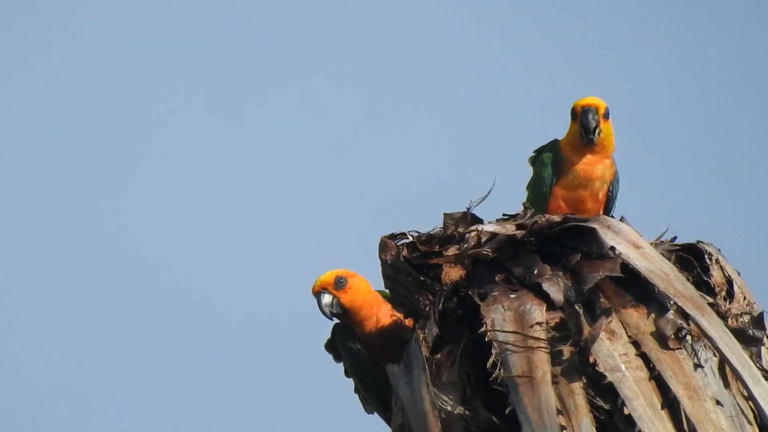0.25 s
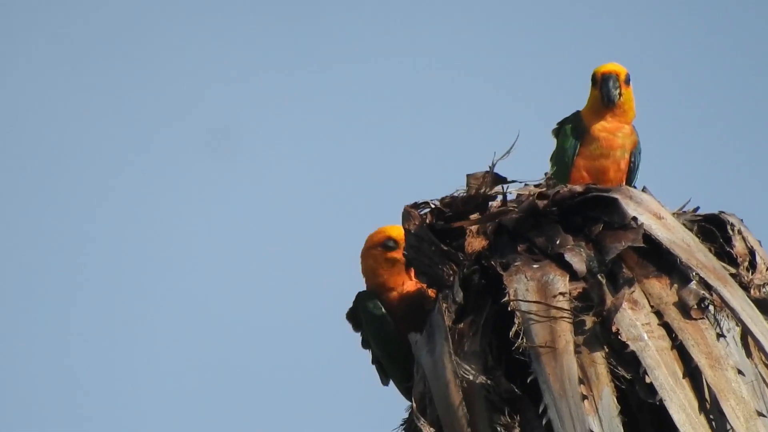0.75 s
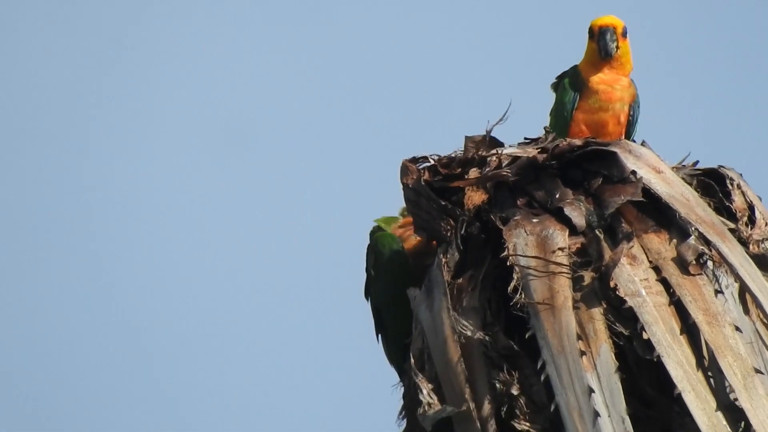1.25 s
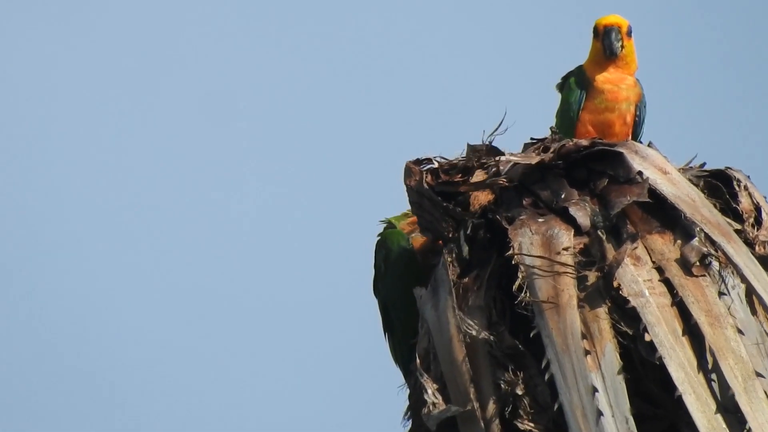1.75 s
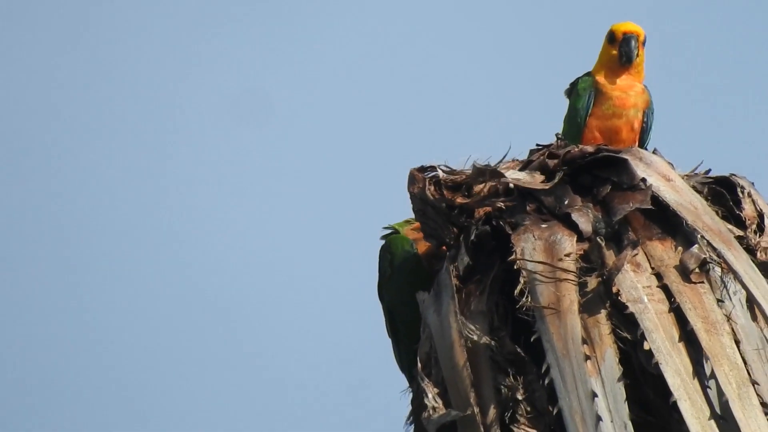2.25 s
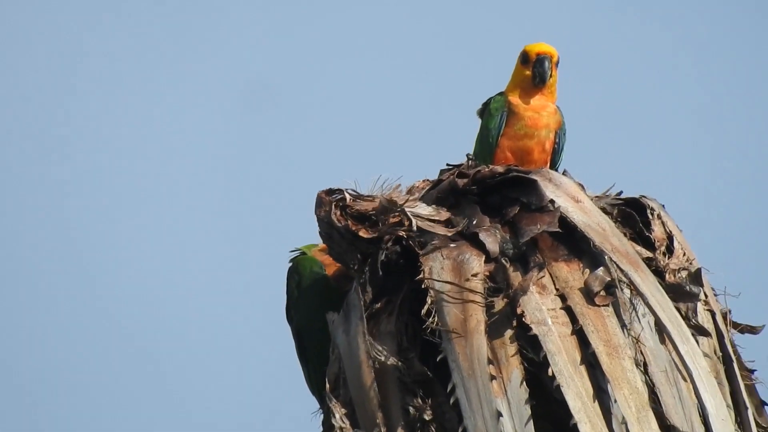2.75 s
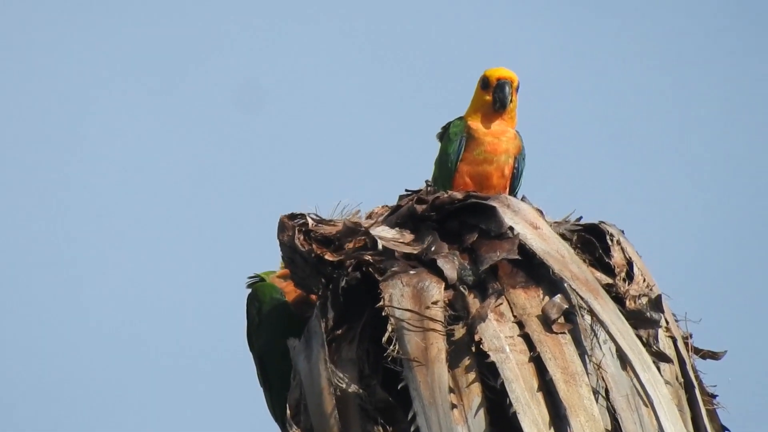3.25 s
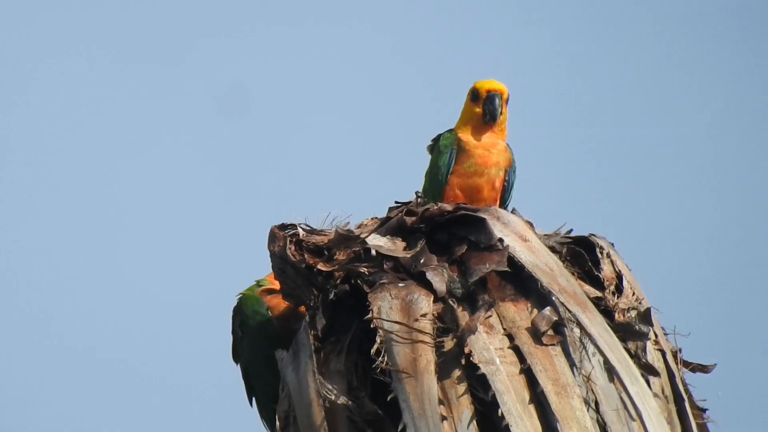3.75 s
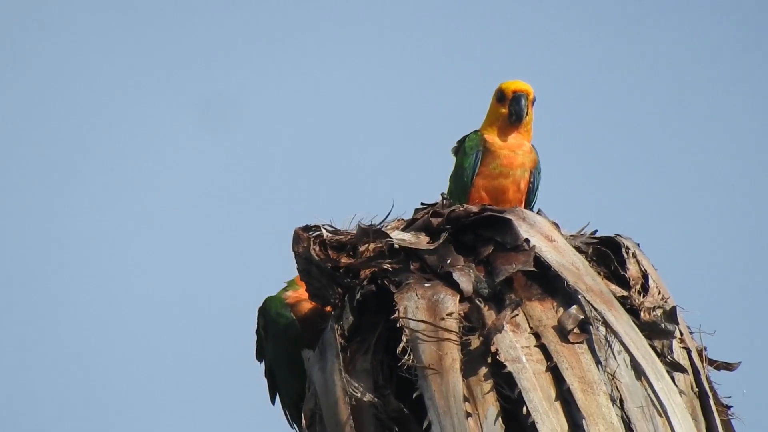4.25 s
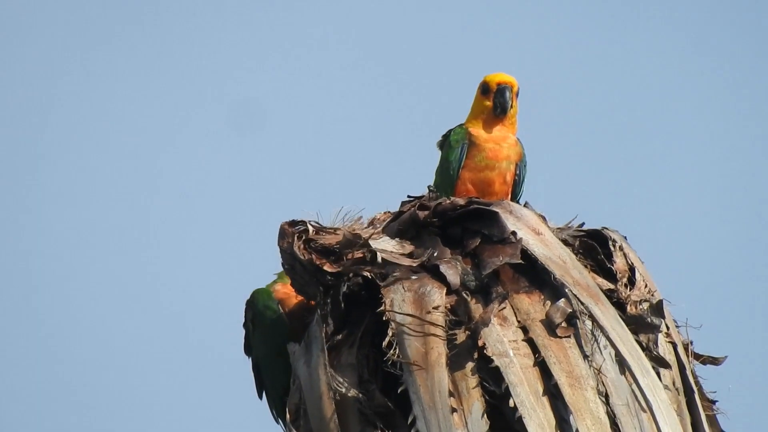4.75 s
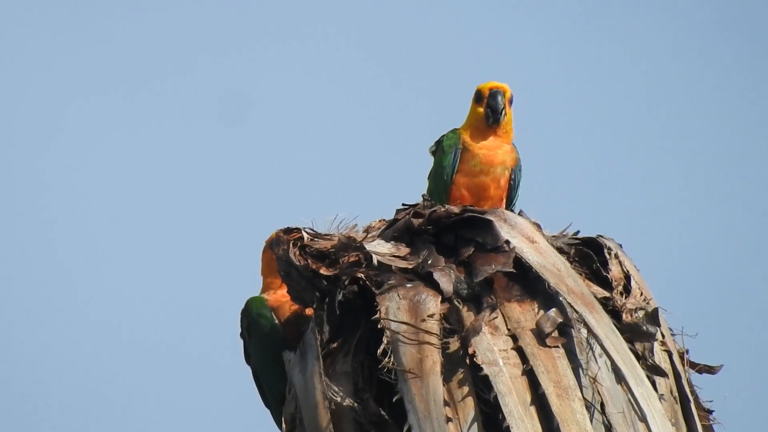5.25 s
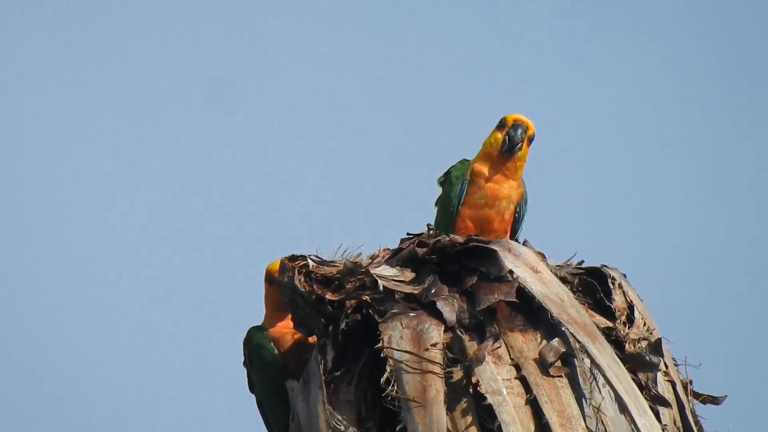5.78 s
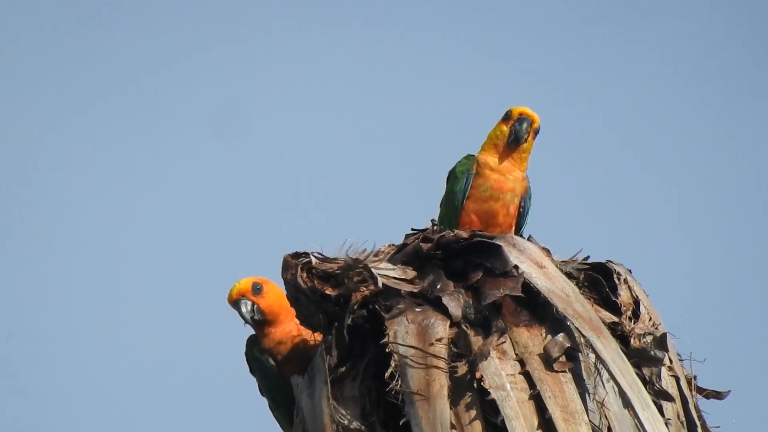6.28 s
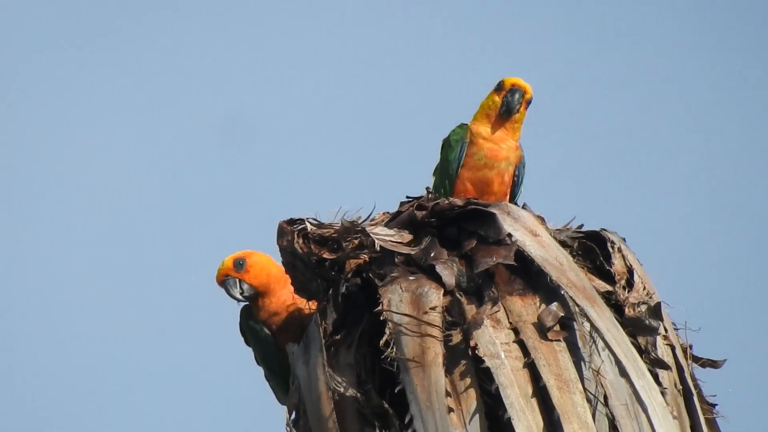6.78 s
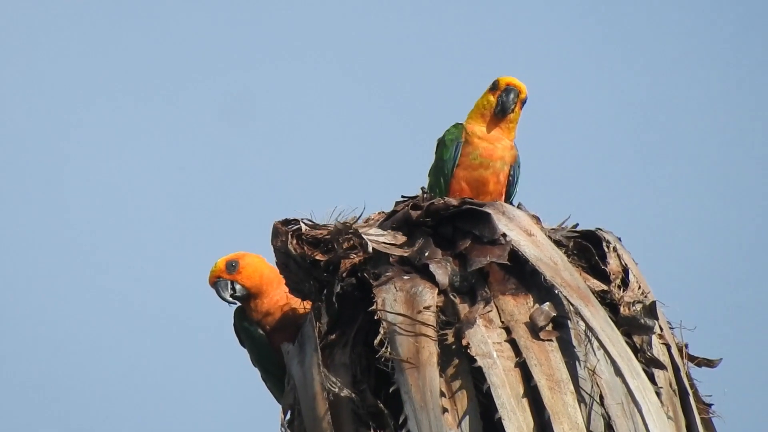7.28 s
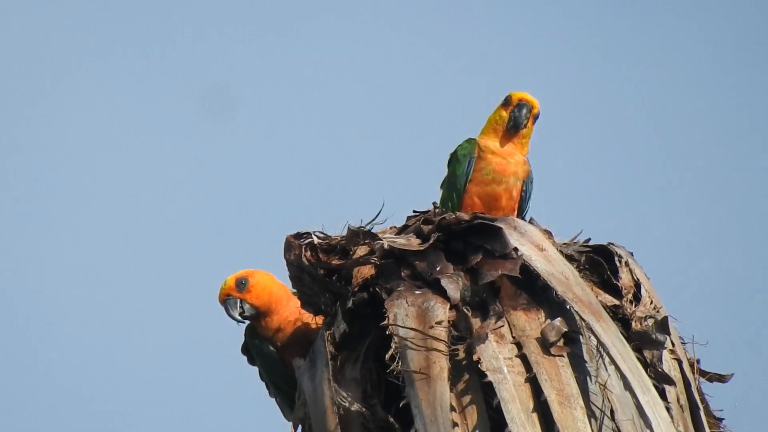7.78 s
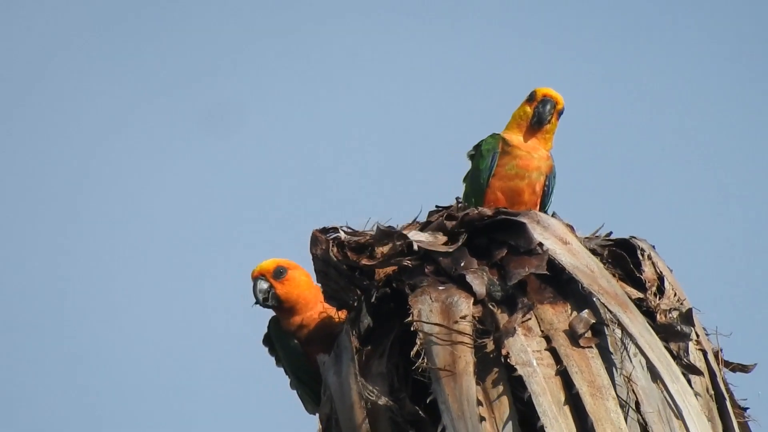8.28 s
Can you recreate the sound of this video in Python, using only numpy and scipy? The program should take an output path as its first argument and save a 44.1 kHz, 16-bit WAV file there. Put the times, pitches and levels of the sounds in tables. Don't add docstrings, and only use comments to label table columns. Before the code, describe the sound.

Loud raspy parrot screams, one early and four in quick succession later, echo among trees while small birds whistle and light wind bumps the microphone.

```python
import sys
import numpy as np
from scipy import signal
from scipy.fft import rfft, irfft
from scipy.io import wavfile
from scipy.ndimage import uniform_filter1d

SR = 44100
rng = np.random.default_rng(int(sys.argv[2]) if len(sys.argv) > 2 else 0)


def materialize(psi):
    bounded = np.clip(np.atleast_2d(psi).T, -1, 1)
    quanta = np.round(bounded * 32767).astype(np.int16)
    wavfile.write(sys.argv[1], SR, quanta)


def boost_factor(decibels):
    exponent = np.asarray(decibels, float) / 20
    return 10 ** exponent


N = 375732
LEFT_RIGHT = np.array([[.5], [-.5]])


def evened(x):
    return x / np.sqrt(np.mean(x ** 2) + 1e-20)


def read(points, hz):
    f, value = np.transpose(points)
    return np.interp(np.log(hz + 1), np.log(f + 1), value)


def add(mix, s, sound):
    part = mix[..., round(s * SR):][..., :sound.shape[-1]]
    part += sound[..., :part.shape[-1]]


def wander(count, blur_hz):
    r = np.exp(-np.pi * blur_hz / SR)
    z = rng.standard_normal((count + 2000, 2)) @ [1, 1j]
    z = signal.lfilter([1], np.convolve([1, -r], [1, -r]), z)[2000:]
    return z / np.sqrt(np.mean(abs(z) ** 2))


# frequency in Hz, level in dB over the effort.
SECOND = [(1800, -19), (2050, -26.5), (2100, -16), (2140, -38.5), (2195, -9), (2250, -14.5), (2320, -10.5)]
THIRD = [(2700, -41), (3000, -18), (3110, -9.5), (3175, -10), (3260, -31.5), (3320, -16.5), (3370, -5),
         (3450, -16)]
FOURTH = [(3600, -3), (3950, -8), (4170, -3), (4290, -3), (4390, -11), (4480, -5), (4600, -7)]
SIXTH = [(5400, 4.5), (5900, 4), (6250, 3.5), (6500, 3.5), (6650, 0.5), (6900, 2)]
# frequency in Hz, level in dB over the 6th partial.
BEAK = [(4800, -1.5), (7000, -3), (8000, -14.5), (9100, -22), (10000, -29), (11300, -48), (12400, -49.5),
        (13500, -67), (15500, -68)]
# frequency in Hz, left-right dB toward the palm.
PORTS = [(2000, 3), (3500, 1), (4500, 4), (5300, -1), (6400, 5.5), (6800, -3.5), (7400, 10), (8000, 4.5),
         (8900, -4.5), (10500, 7)]
# frequency in Hz, radians the left port leads.
LEAD = [(0, 0.66), (3100, -0.31), (4220, 0.76), (4480, -0.74), (5860, 0.93), (6550, -1.02), (6800, -0.84),
        (7750, -1.1), (8270, -0.36), (8530, -1.9), (9560, 1), (10800, -0.55), (11700, -0.3), (15300, 0.0)]


def scream(length, db, swell_db, arch, head):
    top_hz, rise, sag, collapse, drop_hz = arch
    second_db, third_db, odd_db, top_db = head
    t = np.arange(0, length, 1 / SR)
    to_end = t - length

    hz = top_hz - 250 * np.exp(-t / rise) - sag * t
    hz = hz - drop_hz * np.maximum(1 + to_end / collapse, 0) ** 1.8
    turns = np.cumsum(hz * (1 + 0.004 * wander(len(t), 145).real)) / SR

    effort = db + swell_db * (t / length - .5)
    effort = effort - 15 * np.exp(-t / 0.005) - 24 * np.exp(to_end / 0.0058)
    low = effort - np.exp(-t / 0.007) - 21 * np.exp(to_end / 0.007)
    sixth = effort + read(SIXTH, 6 * hz)
    late_db = odd_db - 26 * np.exp(-(t / 0.011) ** 2) - 12 * np.exp(-(to_end / 0.013) ** 2)

    level = {}
    for k in range(5, 14):
        level[k] = sixth + read(BEAK, k * hz)
        if k % 2:
            level[k] = level[k] + late_db - (k > 10) * odd_db
        if k > 8:
            level[k] = level[k] + top_db - 14 * np.exp(-t / 0.0068)
    level[2] = low + second_db + read(SECOND, 2 * hz)
    level[1] = level[2] - 28
    level[3] = low + third_db + read(THIRD, 3 * hz)
    level[4] = effort + read(FOURTH, 4 * hz)
    level[6] = sixth

    out = 0
    for k, partial_db in level.items():
        flutter_db = (1.2 + .17 * k) * wander(len(t), 60).real
        apart = .5 * wander(len(t), 22)
        lead = LEFT_RIGHT * (1.3 * read(LEAD, k * hz) + k / 6 * apart.imag)
        tone = np.sqrt(2) * np.cos(2 * np.pi * (k * turns + rng.random()) + lead)
        side_db = LEFT_RIGHT * (read(PORTS, k * hz) + 5 * apart.real)
        out = out + boost_factor(partial_db + flutter_db + side_db) * tone
    return out * signal.windows.tukey(len(t), .04)


def note(length, first_hz, last_hz, db, blur_hz):
    u = np.linspace(0, 1, round(length * SR))
    turns = np.cumsum(first_hz + (last_hz - first_hz) * u) / SR
    carrier = np.exp(2j * np.pi * turns)
    tone = ((70 / blur_hz + wander(len(u), 2.17 * blur_hz)) * carrier).real
    return boost_factor(db + LEFT_RIGHT * 1.5) * evened(tone) * signal.windows.tukey(len(u), .6)


def notes_of(rows, blur_hz):
    mix = np.zeros((2, N))
    for s, *row in rows:
        add(mix, s, note(*row, blur_hz))
    return mix


# start in seconds, length in seconds, effort in dB, swell of the effort in dB.
SCREAMS = [
    (0.293, 0.17, -19, -2),
    (5.37, 0.17, -15.5, -0.5),
    (5.679, .16, -17.5, 0),
    (6.065, .178, -19.5, 6.5),
    (6.433, 0.17, -23.5, 2.5),
]
# pitch in Hz, rise in seconds, sag in Hz per second,
# collapse in seconds, collapse in Hz.
ARCH = [(1169.5, 0.0078, 540, .06, 165), (1172, .012, 540, .035, 200), (1149.4, 0.0063, 300, 0.052, 200),
        (1112.7, 0.00498, 300, .047, 205), (1091.2, 0.00615, 280, 0.05, 190)]
# 2nd partial in dB, 3rd in dB, high odd partials in dB,
# partials above 9.5 kHz in dB.
HEAD = [(1, -0.5, -8.5, 1.5), (-4.5, -4.5, -6, 5), (-5, -4, -10.5, 1), (-1.5, 1, -9, 6.5),
        (-0.5, 1.5, -15.5, 3)]
# lead in seconds, pitch in Hz, level in dB.
OPENINGS = [(.013, 2900, -31), (.011, 3180, -33.5), (.012, 3220, -36.5), (.016, 2780, -33.5),
            (.012, 3570, -35.5)]


def near_parakeet():
    mix = np.zeros((2, N))
    for (s, *row), arch, head, (lead, hz, db) in zip(SCREAMS, ARCH, HEAD, OPENINGS):
        add(mix, s, scream(*row, arch, head))
        add(mix, s - lead, note(0.0135, hz, 1.15 * hz, db, blur_hz=249))
    return mix


# multiple of the pitch, level in dB.
FAR_ORDERS = [(2, -0.5), (3, -2), (4, 3.5), (5, -12), (6, 2), (7, -14), (8, -36)]


def far_call(length, hz, db, blur_hz):
    u = np.linspace(0, 1, round(length * SR))
    arch = 1 - .13 * np.exp(-u / .17) - .03 * u - .12 * np.exp((u - 1) / .1)
    turns = np.cumsum(hz * arch) / SR
    stack = 0
    for k, order_db in FAR_ORDERS:
        dull_db = 0.031 * blur_hz * max(k - 3.5, 0)
        blurred = 50 / blur_hz + wander(len(u), blur_hz)
        stack = stack + boost_factor(order_db - dull_db) * (blurred * np.exp(2j * np.pi * k * turns)).real
    return boost_factor(db + LEFT_RIGHT * 6.5) * evened(stack) * signal.windows.tukey(len(u), .5)


# start in seconds, length in seconds, pitch in Hz, level in dB, blur in Hz.
FAR = [
    (0.938, 0.12, 1032, -43.5, 39),
    (1.183, 0.185, 1140, -35.5, 8),
    (1.292, 0.115, 1007, -40.5, 66),
]


def far_parakeets():
    mix = np.zeros((2, N))
    for s, *row in FAR:
        add(mix, s, far_call(*row))
    return mix


# start in seconds, length in seconds, first Hz, last Hz, level in dB. The first row is the
# 2 kHz tone of the faint far parakeet call.
WHISTLES = [(0.964, 0.065, 2020, 2050, -60), (8.009, 0.079, 3640, 3670, -41.5),
            (0.524, 0.19, 2010, 1988, -54), (1.599, 0.044, 2930, 2660, -46.5),
            (1.814, 0.17, 2660, 2820, -50.5), (1.929, 0.099, 2356, 2325, -47.5),
            (2.307, 0.14, 2010, 1927, -50), (2.994, .12, 4770, 5700, -47), (3.209, 0.15, 4860, 4880, -49),
            (3.518, 0.037, 5150, 4920, -51), (3.495, 0.071, 2970, 2840, -46),
            (3.509, 0.086, 6400, 6440, -48), (3.767, 0.04, 4730, 4700, -46),
            (3.97, 0.058, 5150, 4870, -45.5), (4.03, 0.046, 5070, 5000, -49),
            (4.156, 0.052, 5840, 4720, -50), (4.394, 0.033, 5480, 4960, -39),
            (4.443, 0.093, 4570, 4620, -49.5), (4.856, 0.06, 4840, 4680, -50),
            (7.016, 0.15, 2374, 2394, -55)]


def whistles():
    return notes_of(WHISTLES, blur_hz=50)


# start in seconds, length in seconds, first Hz, last Hz, level in dB. The last
# row is the rough 4 kHz part of a far parakeet call.
WARBLE = [(6.685, 0.075, 3680, 4090, -42.5), (6.779, 0.16, 3840, 3990, -50.5),
          (6.889, 0.087, 3570, 3180, -50), (6.968, 0.091, 3870, 3747, -48.5),
          (7.018, 0.068, 3660, 3790, -48), (7.091, 0.062, 3650, 3620, -48), (7.133, 0.13, 3900, 4320, -47),
          (7.202, 0.067, 3580, 3590, -39.5), (7.33, 0.19, 3690, 3730, -43),
          (7.465, 0.061, 4060, 3980, -44.5), (7.503, 0.135, 3620, 3490, -51),
          (7.396, 0.095, 2760, 3070, -50.5), (7.702, 0.083, 3800, 4020, -46),
          (1.303, 0.12, 3880, 4010, -40)]
# start in seconds, length in seconds, first Hz, last Hz, level in dB.
CHATTER = [
    (3.175, 0.077, 3920, 4300, -42),
    (7.641, 0.242, 3600, 3500, -51),
    (7.64, 0.165, 4200, 4760, -45),
    (7.74, .32, 4600, 5030, -45.5),
    (7.748, 0.57, 3115, 2700, -57.5),
]


def far_song():
    return notes_of(WARBLE, blur_hz=105) + notes_of(CHATTER, blur_hz=320)


# frequency in Hz, t60 in seconds.
TREES = [(2000, 0.55), (4500, 1), (6500, 0.68), (10000, 0.27)]


def trees(x, close_db):
    taps = np.zeros((2, SR))
    at = np.arange(100, SR - 20, 20) + rng.integers(0, 20, (1, (SR - 101) // 20))
    shared = rng.choice([-1., 1.], at.shape)
    own = rng.choice([-1., 1.], (2, at.size))
    np.put_along_axis(taps, at + [[0], [0]], shared + 0.5 * own, 1)
    taps *= 1 + boost_factor(close_db - 60 * np.arange(SR) / SR / 0.17)
    hz, t, z = signal.stft(taps, SR, nperseg=256)
    decay = boost_factor(-60 * t / read(TREES, hz)[:, None])
    tail = signal.istft(z * decay, SR, nperseg=256)[1]
    return signal.oaconvolve(x, tail[:, :SR * 2 // 3] / np.linalg.norm(tail[0]), axes=1)[:, :N]


def earlier_echo():
    earlier = scream(*SCREAMS[0][1:], ARCH[0], HEAD[0])
    echo = trees(np.pad(earlier, ((0, 0), (0, SR))), close_db=-7)
    mix = np.zeros((2, N))
    add(mix, 0, boost_factor(-15) * echo[:, earlier.shape[1] + 2500:])
    return mix


def snap(db, hz, side_db, width_hz, decay):
    t = np.arange(round(6 * decay * SR)) / SR
    band = (wander(len(t), width_hz) * np.exp(2j * np.pi * hz * t)).real
    band = band * np.exp(-t / decay) * np.minimum(t / 0.00063, 1)
    band = signal.lfilter(*signal.butter(4, 9500, fs=SR), band)
    return boost_factor(db + LEFT_RIGHT * side_db) * band / abs(band).max()


# start in seconds, peak in dB, pitch in Hz, left-right dB.
TICKS = [(2.5158, -39, 1060, 1.2), (2.5293, -28, 6450, 13), (2.7175, -31, 4630, 7), (3.3994, -37, 6100, 4),
         (3.4431, -35, 6500, 4), (3.7232, -32, 6130, 4), (3.86, -32, 6370, -2), (4.4132, -20.5, 5360, 9),
         (4.7604, -28.5, 8200, 8), (4.888, -33, 4900, 2.2), (6.994, -42, 3900, 0), (7.08, -33.5, 6500, 5),
         (7.317, -31.5, 6720, 2.2), (7.944, -37, 4770, 9)]
# start in seconds, peak in dB, pitch in Hz, width in Hz,
# decay in seconds.
KNOCKS = [
    (2.519, -29.5, 1075, 200, 0.006),
    (1.346, -26, 5800, 2000, 0.077),
    (2.519, -26.5, 3260, 1200, 0.0035),
    (4.398, -30, 1387, 1500, 0.028),
    (4.403, -26, 3420, 700, 0.0096),
    (4.418, -29, 4610, 3030, 0.052),
    (6.993, -27, 6800, 2000, 0.0019),
]


def fronds():
    mix = np.zeros((2, N))
    for s, *row in TICKS:
        add(mix, s, snap(*row, width_hz=2700, decay=0.0064))
    for s, db, hz, *ring in KNOCKS:
        add(mix, s, snap(db, hz, 1.7, *ring))
    return mix


# start in seconds, length in seconds, first Hz, last Hz, level in dB. The first row is a
DRONE = [(3.83, 0.39, 50.1, 49.2, -39), (.9, 0.49, 158.5, 154.5, -51), (2.0, 0.42, 159.6, 152.5, -50.5),
         (2.66, 0.38, 152.6, 232.5, -46.5), (4.6, 0.21, 195.7, 210, -48.5), (5.1, 0.22, 203, 202, -52.5),
         (5.72, 0.22, 178.6, 210, -48), (6.22, 0.54, 200, 187, -54), (6.85, 0.37, 204, 204.3, -52),
         (8.0, 0.56, 130.5, 110.5, -53)]


def engine():
    return notes_of(DRONE, blur_hz=14)


# frequency in Hz, left-right likeness.
SAME = [(40, 0.73), (130, 0.81), (290, 0.77), (640, 0.93), (1400, 0.85), (3100, 0.7), (6800, 0.093),
        (15000, 0.037)]
# frequency in Hz, left-right dB.
LEAN = [(60, 1.0), (180, 1.5), (550, 2.5), (1650, 1.5), (4970, 1.5), (15000, 1.0)]


def hiss(field_db, size):
    frames = N * 4 // size + 5
    hz = np.fft.rfftfreq(size, 1 / SR)[:, None]
    a, b, c, d = rng.standard_normal((frames, len(hz), 4)).T
    same = np.clip(read(SAME, hz), -1, 1)
    left = a + 1j * b
    z = np.array([left, same * left + np.sqrt(1 - same ** 2) * (c + 1j * d)])
    level_db = field_db(hz, np.arange(frames) * size / 4 / SR)
    z *= boost_factor(level_db + LEFT_RIGHT[:, :, None] * read(LEAN, hz))
    return evened(signal.istft(z, nperseg=size, noverlap=size * 3 // 4)[1][:, :N])


# start in seconds, length in seconds, bump in dB, roar in dB over the steady breeze.
GUSTS = [
    (1.75, 0.13, 12, -1),
    (2.366, .16, 13.5, -4.5),
    (3.325, 0.064, 3, 2.5),
    (3.822, 0.23, 16, 9),
    (5.768, 0.13, 7, -1.5),
    (6.536, 0.068, 8, -4),
    (6.74, 0.12, 5, 0),
    (7.774, 0.17, 15.5, -2),
]
# frequency in Hz, level in dB per Hz.
BUMP = [(20, -19), (32, -11), (47, -8.5), (60, 4), (85, -10)]
ROAR = [(70, -8.5), (100, -1), (200, 0), (250, -10.5), (400, -14.5)]


def wind():
    hz = np.fft.rfftfreq(N, 1 / SR)
    gusts_db = np.zeros((2, N))
    for s, length, *db in GUSTS:
        add(gusts_db, s, np.outer(db, signal.windows.tukey(round(length * SR), .35)))
    lumps_db = 0.5 * wander(N, 7.2).real
    flat = rfft(hiss(lambda f, _: 0 * f, size=1024))
    bump = evened(irfft(flat * boost_factor(read([(1, -82)] + BUMP + [(200, -86)], hz)), N))
    roar = evened(irfft(flat * boost_factor(read([(30, -80)] + ROAR + [(900, -80)], hz)), N))
    return boost_factor(-56 + gusts_db[0] + lumps_db) * bump + boost_factor(-50 + gusts_db[1]) * roar


# frequency in Hz, level in dB per Hz.
AIR = [(130, -49), (250, -21), (400, -19.5), (560, -7), (800, -16), (1140, -12.5), (1500, -18),
       (3000, -19.5), (4500, -17.5), (6500, -11.5), (7400, -17), (9500, -30.5), (12500, -41.5),
       (15700, -46)]
# time in seconds, level in dB.
STIR = [(0, 3.5), (.57, 4), (1.2, 4.5), (2.6, 2.5), (4.3, 1.45), (8, 1.4), (8.2, -0.5), (8.52, 1.5)]


def air():
    s, stir_db = np.transpose(STIR)

    def patchwork(hz, t, span):
        return uniform_filter1d(rng.standard_normal((len(t), len(hz))), span, 0)

    def field_db(hz, t):
        leaves = np.clip(np.log2((hz + 1) / 1500) / 1.15, 0, 1)
        flicker_db = .85 * (rng.exponential(1, len(t)) - 1)
        traffic_db = -.45 * (t - t.mean())
        swell_db = (1 - leaves) * traffic_db + leaves * (np.interp(t, s, stir_db) + flicker_db)
        shake_db = 8.5 * np.exp(-((t - 4.41) / 0.018) ** 2)
        patches = evened(uniform_filter1d(patchwork(hz, t, 10), 8, 1)).T
        streaks = evened(patchwork(hz, t, 30)).T
        texture_db = 1.8 * patches + 3.64 * (1 - 0.45 * leaves) * streaks
        return read(AIR, hz) + swell_db + shake_db + texture_db
    return boost_factor(-42.5) * hiss(field_db, size=512)


def scene():
    near = near_parakeet()
    far = far_parakeets() + whistles()
    song = far_song()
    birds = near + boost_factor(-7.5) * trees(near, close_db=15.5)
    birds = birds + far + boost_factor(-7) * trees(far, close_db=6)
    birds = birds + song + boost_factor(-4) * trees(song, close_db=3)
    return birds + earlier_echo() + fronds() + engine() + wind() + air()


def band_limit(x):
    return signal.sosfilt(signal.butter(12, 15800, fs=SR, output="sos"), x)


def record(dry):
    over = np.maximum(abs(dry) - .8, 0)
    held = dry - np.sign(dry) * (over - .15 * np.tanh(over / .15))
    return band_limit(held)


dry = scene()
out = record(dry)
materialize(out)
```